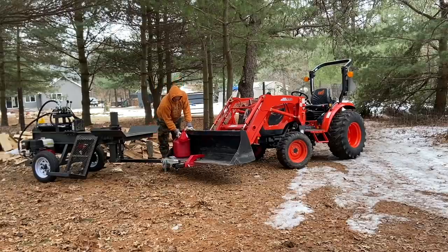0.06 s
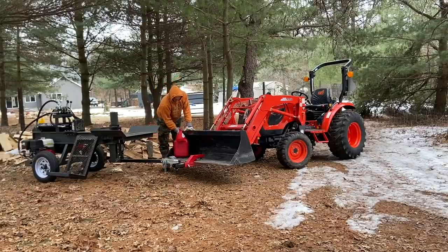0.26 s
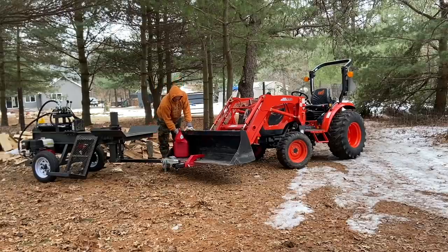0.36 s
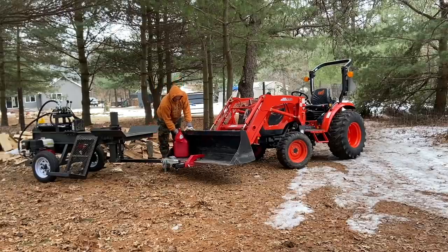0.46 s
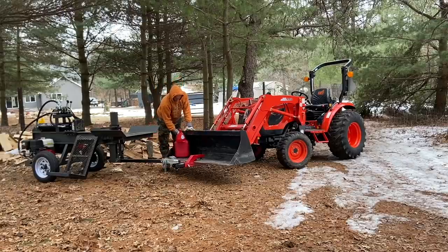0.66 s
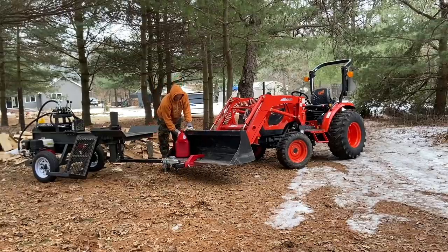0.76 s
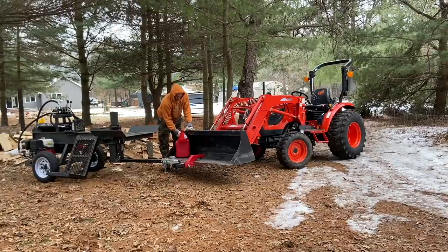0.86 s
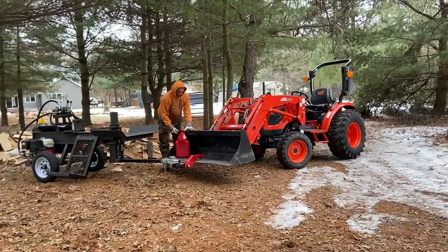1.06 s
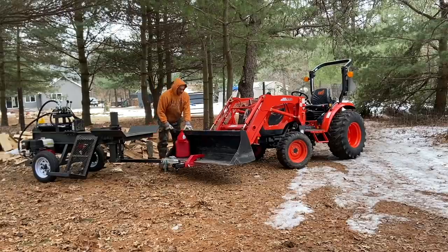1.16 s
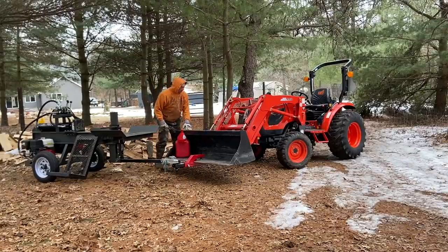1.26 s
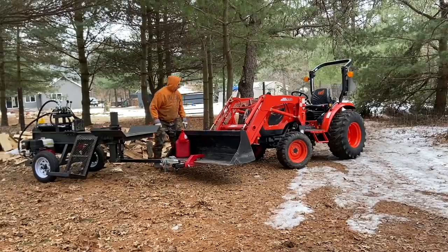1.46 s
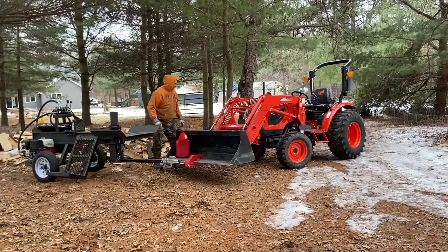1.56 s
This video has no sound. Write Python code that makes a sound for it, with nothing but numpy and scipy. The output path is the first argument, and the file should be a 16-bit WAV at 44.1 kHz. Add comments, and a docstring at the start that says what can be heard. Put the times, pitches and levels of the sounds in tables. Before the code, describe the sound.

A full fuel can thuds and clanks down onto a steel tractor bucket outdoors.

```python
"""A full fuel can is set down on the steel bucket of a parked tractor, among trees and a faint rumble.
A few light touches come first. From 0.2 s the can lands in a cluster of dull thuds, ringing knocks and
gritty cracks; the hard ones clang, and the bucket hums on. Around 0.6 s the can is shoved into place.
From 0.9 s the handler straightens up: feet shift, a jacket rustles, a small catch clicks at 1.3 s,
and a soft shuffle ends the scene."""
import sys
import numpy as np
from scipy import signal
from scipy.fft import rfft, irfft
from scipy.io import wavfile

SR = 44100
rng = np.random.default_rng(int(sys.argv[2]) if len(sys.argv) > 2 else 0)


def generate_wav(sig):
    """Save sig (samples, or channels by samples) to the path in sys.argv[1] as 16-bit PCM at SR."""
    pcm = np.round(np.clip(np.atleast_2d(sig).T, -1, 1) * 32767).astype(np.int16)
    wavfile.write(sys.argv[1], SR, pcm)


N = 70560


def from_db(db):
    """Decibels to gain."""
    return 10 ** (np.asarray(db) / 20)


def seconds():
    """Time of every sample."""
    return np.arange(N) / SR


def level(curve):
    """A fader ride: gain over time from (s, dB) points."""
    return from_db(np.interp(seconds(), *np.transpose(curve)))


def at_hz(points, hz):
    """An EQ curve: gain from (Hz, dB) points on a log axis."""
    point_hz, db = np.transpose(points)
    return from_db(np.interp(np.log(hz + 1), np.log(point_hz), db))


# Stereo width of all noise. Each row: frequency in Hz, side level against mid in dB.
WIDTH = [(60, -20.5), (200, -17.5), (700, -6.5), (1300, -12), (4000, -5.5), (8000, -16), (16000, -23)]

def noise(colour, grain_db=0, wider_db=0):
    """Stereo noise of a given colour at rms 1; grain_db clumps it into millisecond grains."""
    hz = np.fft.rfftfreq(N, 1 / SR)
    clumps = np.interp(seconds(), np.arange(2000) / 1000, rng.standard_normal(2000))
    grains = rng.standard_normal((2, N)) * from_db(grain_db * clumps)
    mid, side = rfft(grains) * at_hz(colour, hz)
    side = side * at_hz(WIDTH, hz) * from_db(wider_db)
    stereo = irfft(np.array([mid + side, mid - side]), N)
    return stereo / np.std(stereo)


def bursts(rows, attack, t60):
    """Envelope of (s, dB) events: straight rise, exponential fall."""
    t = np.arange(min(N, int(2 * t60 * SR))) / SR
    shape = np.minimum(t / attack, 1) * np.exp(-np.log(1000) * np.maximum(t - attack, 0) / t60)
    envelope = np.zeros(2 * N)
    for s, db in rows:
        start = max(int(s * SR), 0)
        envelope[start:start + len(t)] += from_db(db) * shape
    return envelope[:N]


def ring(times, gains, hz, t60):
    """A mode struck at the given times rings as a sine that dies by 60 dB in t60 seconds."""
    samples = np.clip(np.asarray(times) * SR, 0, N - 1).astype(int)
    strikes = np.bincount(samples, gains, N)
    decay, angle = from_db(-60 / (t60 * SR)), 2 * np.pi * hz / SR
    feedback = [1, -2 * decay * np.cos(angle), decay * decay]
    return signal.lfilter([0, decay * np.sin(angle)], feedback, strikes + 1e-18)


def struck(rows, modes):
    """A set of modes, alternating in sign, struck by (s, dB) events."""
    starts, db = np.transpose(rows)
    return sum((-1) ** k * ring(starts, from_db(db + mode_db), hz, t60)
               for k, (hz, mode_db, t60) in enumerate(modes))


def soften(blow, contact_s):
    """Spread a blow over a smooth contact time, dulling its top."""
    pole = np.exp(-4 / (contact_s * SR))
    return signal.lfilter([(1 - pole) ** 2], [1, -2 * pole, pole * pole], blow + 1e-18)


# Tone of the low rumble and of the air above it. Each row: frequency in Hz, relative level in dB.
RUMBLE_COLOUR = [(15, -42), (32, -33), (45, 2.5), (58, 3), (80, -1.5), (120, -5.5), (200, -14.5),
                 (400, -29), (2000, -82)]
AIR_COLOUR = [(100, -7), (200, -13), (300, -3.5), (450, -2.5), (800, -2), (1200, -17.5), (2500, -32),
              (6000, -48), (16000, -54)]

def outdoors():
    """A steady bed of faint rumble under wider, quieter air."""
    return from_db(-55) * noise(RUMBLE_COLOUR) + from_db(-66) * noise(AIR_COLOUR, wider_db=9.5)


# Tone of the echo from the trees. Each row: frequency in Hz, relative level in dB.
WOODS_COLOUR = [(50, -3), (200, -0.5), (600, 1.5), (2000, -10), (6000, -5.5), (16000, -15)]

def woods(sound):
    """Trunks scatter a thin, dull tail."""
    tail = noise(WOODS_COLOUR, wider_db=10) * bursts([(0.0011, 0)], attack=0.0092, t60=0.6)
    tail = tail / np.sqrt(np.sum(tail ** 2) / 2)
    return from_db(-21) * signal.fftconvolve(sound, tail, axes=1)[:, :N]


# Fader rides for sleeves, shuffle and scrape. Each row: time in seconds, level in dB.
SLEEVE_RIDE = [(0, -77), (.05, -82.5), (.1, -107), (.56, -101), (.61, -67.5), (.68, -75), (.78, -73),
               (.84, -84), (.99, -79), (1.11, -65.5), (1.25, -63.5), (1.32, -63.5), (1.38, -75.5),
               (1.53, -64.5), (1.6, -66.5)]
SHUFFLE_RIDE = [(1.35, -76), (1.44, -68), (1.52, -60.5), (1.6, -63)]
SCRAPE_RIDE = [(1.32, -105), (1.36, -83), (1.46, -76.5), (1.6, -79)]
# Their tones: bright, soft and narrow. Each row: frequency in Hz, relative level in dB.
SLEEVE_COLOUR = [(500, -12), (2000, 0.5), (5000, -3.5), (7200, 4), (9000, -0.5), (12000, 6.5),
                 (16000, -1.5)]
SHUFFLE_COLOUR = [(200, -6.5), (600, 4), (1300, -14.5), (2600, -11.5), (4000, -10), (6000, -20),
                  (16000, -53)]
SCRAPE_COLOUR = [(1550, -43), (1780, 0), (1920, -2), (2200, -42)]

def handler():
    """Sleeves brush the jacket; the handler shuffles back, and a thin scrape is heard."""
    sleeves = level(SLEEVE_RIDE) * noise(SLEEVE_COLOUR, grain_db=2.5, wider_db=4)
    shuffle = level(SHUFFLE_RIDE) * noise(SHUFFLE_COLOUR, grain_db=2, wider_db=4)
    scrape = level(SCRAPE_RIDE) * noise(SCRAPE_COLOUR, grain_db=2)
    return sleeves + shuffle + scrape


# The handler shifts weight. Each row: start in seconds, level in dB, pitch in Hz.
FOOTFALLS = [(0.936, -44, 62), (1.152, -44, 61), (1.362, -40, 63)]

def footfalls():
    """Feet press soft, low bumps into the ground."""
    bumps = sum(ring([start], [from_db(db)], hz, t60=0.24) for start, db, hz in FOOTFALLS)
    return soften(bumps, contact_s=0.0021)


# The catch's brief ring. Each row: pitch in Hz, relative level in dB, ring time in seconds.
CATCH_MODES = [(434, -9, 0.052), (972, -10, 0.049), (1170, -18, 0.072), (4230, -5, 0.0031),
               (6900, -5, 0.002), (11500, 8.5, 0.0042), (14900, 10, 0.002)]
# Tone of its tail. Each row: frequency in Hz, relative level in dB.
CATCH_COLOUR = [(1000, 0), (1600, -2.5), (4200, -5), (8000, -5), (12000, -1), (16000, -7)]

def catch():
    """A catch snaps shut just left of centre, with a brief ring and a faint bright tail."""
    start_s, right_lag_s = 1.3036, 0.00003
    snap = struck([(start_s, -39)], CATCH_MODES)
    delay = np.exp(-2j * np.pi * np.fft.rfftfreq(N, 1 / SR) * right_lag_s)
    late_snap = irfft(rfft(snap) * delay, N)
    tail = bursts([(start_s, -47.5)], attack=0.00028, t60=0.047) * noise(CATCH_COLOUR, wider_db=8)
    return np.array([snap, late_snap]) + tail


# Loose metal parts touch. Each row: start in seconds, level in dB, pitch in Hz.
CHINKS = [(0.055, -51.5, 1235), (0.1, -58.5, 1530), (0.107, -59, 2004), (0.138, -60.5, 1245),
          (0.4638, -48.5, 1783), (0.6, -52.5, 1220), (0.641, -45.5, 787), (0.6765, -46.5, 1774),
          (0.701, -50, 1404), (0.714, -49, 1220), (1.023, -64.5, 1630)]

def chinks():
    """Small metal parts ping against each other, each with a weaker second mode just above."""
    t60 = 0.056
    return sum(ring([start], [from_db(db)], hz, t60) + ring([start], [from_db(db - 13)], hz * 1.1, t60)
               for start, db, hz in CHINKS)


# The bucket is set humming. Each row: start in seconds, level in dB.
HUMS = [(0.0, -43), (0.335, -46), (0.69, -44)]

def hum():
    """The bucket's lowest mode outlasts all the others; a close, weaker partner makes it waver."""
    hum_hz, partner_hz = 166.8, 175.3
    t60s = [0.89] + [1.98] * (len(HUMS) - 1)  # the hands still damp the first hum
    return sum(ring([start], [from_db(db)], hum_hz, t60)
               + ring([start], [from_db(db - 13)], partner_hz, t60)
               for (start, db), t60 in zip(HUMS, t60s))


# Fader ride for the sliding can's grumble. Each row: time in seconds, level in dB.
GRUMBLE_RIDE = [(0, -62), (.09, -52.5), (.13, -60), (.2, -62.5), (.45, -34.5), (.57, -80), (.7, -58.5),
                (.86, -59), (1.1, -89)]
# Its dark tone. Each row: frequency in Hz, relative level in dB.
GRUMBLE_COLOUR = [(120, -9.5), (230, 3), (280, 1), (410, -8.5), (600, -14.5), (1200, -27), (4000, -74)]

def grumble():
    """The plates grumble as the can slides over them."""
    return level(GRUMBLE_RIDE) * noise(GRUMBLE_COLOUR, wider_db=2.5)


# Hits on sharp edges and on the bucket's lip. Each row: start in seconds, level in dB.
EDGE_TICKS = [(0.057, -67), (0.2226, -42.5), (0.324, -43), (0.409, -52), (0.4145, -57), (0.435, -54),
              (0.4622, -55.5), (0.466, -56), (0.641, -61), (0.676, -53), (0.702, -65), (1.091, -63)]
LIP_CLANKS = [(0.3258, -42.5), (0.3332, -36), (0.3505, -44.5), (0.4625, -50), (0.676, -57.5)]
# How edges and lip ring. Each row: pitch in Hz, relative level in dB, ring time in seconds.
EDGE_MODES = [(1295, -5, 0.013), (1853, -4, 0.013), (3320, -2.5, 0.018), (3717, -2.5, 0.022),
              (5300, -8, 0.019), (6630, -2, 0.01)]
LIP_MODES = [(2348, -1.5, 0.077), (2502, -1, 0.049), (2750, -3, 0.041), (2940, -2.5, 0.07),
             (3320, -2, 0.08)]

def clanks():
    """Hard metal contacts: edges tick, and the heavier ones set the bucket's lip clanging."""
    return struck(EDGE_TICKS, EDGE_MODES) + struck(LIP_CLANKS, LIP_MODES)


# Fader ride for the can dragging on steel. Each row: time in seconds, level in dB.
DRAG_RIDE = [(0, -72.5), (.11, -72), (.2, -78.5), (.25, -61.5), (.42, -56), (.55, -76), (.6, -59),
             (.72, -58), (.77, -87), (1.0, -77.5), (1.6, -106)]
# Tone of crushed grit. Each row: frequency in Hz, relative level in dB.
GRIT_COLOUR = [(200, -4.5), (550, 1.5), (800, -3.5), (1200, 1.5), (2000, -8.5), (3000, -14), (4100, -20),
               (6800, -22.5), (11000, -26.5), (16000, -28.5)]
# The plates' upper ring. Each row: pitch in Hz, relative level in dB, ring time in seconds.
UPPER_MODES = [(596, -6.5, 0.25), (850, -2.5, 0.08), (1063, -17, 0.076), (1178, -10, 0.08),
               (1260, -4.5, 0.059), (1480, -16.5, 0.34), (1720, -14, 0.11)]

def grit(starts, levels_db):
    """Grit cracks under each blow and grinds while the can drags; the plates ring with it."""
    envelope = bursts(zip(starts, levels_db), attack=0.0008, t60=0.058)
    cracks = envelope * noise(GRIT_COLOUR, grain_db=2.5)
    grind = level(DRAG_RIDE) * noise(GRIT_COLOUR, grain_db=0.5)
    crunch = cracks + grind
    plate_send = from_db(-4.5) * 2 * np.pi * 100 / SR
    plates = sum(ring([0], [plate_send * from_db(db)], hz, t60) for hz, db, t60 in UPPER_MODES)
    return crunch + signal.fftconvolve(crunch.mean(axis=0), plates)[:N]


# The body of the bucket's plates. Each row: pitch in Hz, relative level in dB, ring time in seconds.
PLATE_MODES = [(201.6, -11, 0.32), (230.3, -12.5, 0.31), (263.3, -12, 0.13), (299.4, -20, 0.28),
               (332.8, -8.5, 0.24), (405, -7, 0.13), (435, -28, 0.32), (514, -14.5, 0.26),
               (561.8, -16.5, 0.18)]

def knocks(starts, levels_db, pitches):
    """Each knock is a short hollow note that wakes the plate modes nearest its own pitch."""
    spread_octaves, plate_trim_db = 0.34, 0.5
    steel = sum(ring([start], [gain], hz, t60=0.11)
                for start, gain, hz in zip(starts, from_db(levels_db), pitches))
    for hz, mode_db, t60 in PLATE_MODES:
        nearness = 1 / np.hypot(1, np.log2(hz / pitches) / spread_octaves)
        steel += ring(starts, nearness * from_db(levels_db + mode_db + plate_trim_db), hz, t60)
    return soften(steel, contact_s=0.0013)


# The loader's boom under the can. Each row: pitch in Hz, relative level in dB, ring time in seconds.
LOADER_MODES = [(62.7, -20.5, 0.36), (77.8, -12.5, 0.14), (117, -19.5, 0.13)]

def thuds(starts, levels_db, pitches):
    """The can's weight gives a low, quickly damped bump and shakes the loader."""
    bumps = sum(ring([start], [gain], hz, t60=0.15)
                for start, gain, hz in zip(starts, from_db(levels_db), pitches))
    loader = sum(ring(starts, from_db(levels_db + mode_db), hz, t60) for hz, mode_db, t60 in LOADER_MODES)
    return soften(bumps + loader, contact_s=0.0033)


# The can meets the bucket. Each row: start in seconds, thud level in dB, thud pitch in Hz,
# knock level in dB, knock pitch in Hz, crack level in dB.
BLOWS = [(0.059, -62, 128, -49, 403, -57.5), (0.159, -63, 116, -65, 206, -62),
         (0.2235, -59, 89, -35, 461, -45), (0.227, -18, 156, -29, 203.3, -66),
         (0.24, -17.5, 102, -31, 230, -55), (0.263, -24.5, 127, -28, 249.2, -85),
         (0.288, -25.5, 113, -35, 230, -92), (0.319, -29, 111, -27, 261, -36.5),
         (0.331, -14.5, 109.7, -18, 237, -31.5), (0.335, -25, 76, -26, 416, -35.5),
         (0.342, -26.5, 72, -21, 218, -50), (0.351, -16.5, 77, -19.5, 395.6, -36.5),
         (0.381, -21, 70, -20.5, 209, -47), (0.409, -23.5, 135.4, -25.5, 279.6, -43.5),
         (0.432, -24, 61.6, -26.5, 273, -50), (0.462, -53, 152, -25, 558.4, -43.5),
         (0.472, -30.5, 178, -22, 276.6, -54), (0.503, -35, 77.6, -38.5, 332, -64.5),
         (0.626, -28, 102.6, -39.5, 206, -76), (0.640, -38, 80, -32.5, 251, -55),
         (0.6757, -30, 106.6, -32, 386, -45), (0.688, -47, 122, -30, 407, -74),
         (0.701, -37, 154, -27, 243.3, -51), (0.735, -48, 120, -38, 227, -76),
         (0.781, -39.5, 58, -52, 303, -66), (1.024, -53, 70, -55, 480, -65),
         (1.091, -62, 99, -55, 422, -64)]

def scene():
    """Each blow plays a thud, a knock and a crack, mixed with metal details, handler and open air."""
    starts, thud_db, thud_hz, knock_db, knock_hz, crack_db = np.transpose(BLOWS)
    low_cut = signal.butter(2, 59, "high", fs=SR, output="sos")  # the deepest bass does not radiate
    bumps = signal.sosfilt(low_cut, thuds(starts, thud_db, thud_hz) + footfalls())
    pan = from_db([[-0.06], [0.06]])  # a hair to the right
    body = (bumps + knocks(starts, knock_db, knock_hz) + hum()) * pan + grumble()
    hits = body + grit(starts, crack_db) + clanks() + chinks() + catch()
    bed = outdoors()
    return hits + woods(hits) + handler() + bed


# Left runs opposite to right in two treble bands. Each row: frequency in Hz, phase in half turns.
LEFT_PHASE = [(0, 0), (8200, 0), (8550, -1), (9500, -1), (9900, -2), (12600, -2), (13000, -3), (13900, -3),
              (14400, -4)]

def record(dry):
    """Roll off the bass, flip the left channel in two treble bands and cut the top steeply."""
    low_cut_hz, top_cut_hz = 40, 15900
    trimmed = signal.sosfilt(signal.butter(3, low_cut_hz, "high", fs=SR, output="sos"), dry)
    hz = np.fft.rfftfreq(2 * N, 1 / SR)
    left, right = rfft(trimmed, 2 * N)
    half_turns = np.interp(hz, *np.transpose(LEFT_PHASE))
    left = left * np.exp(1j * np.pi * half_turns)
    top_cut = 1 / np.sqrt(1 + (hz / top_cut_hz) ** 160)
    return irfft(np.array([left, right]) * top_cut)[:, :N]


dry = scene()
out = record(dry)
generate_wav(out)
```